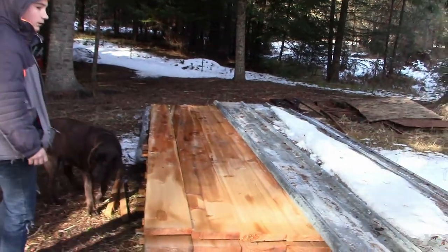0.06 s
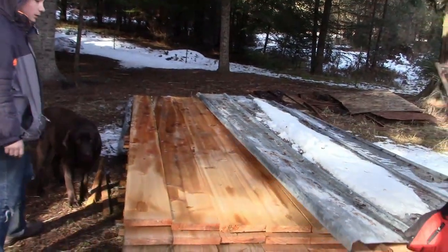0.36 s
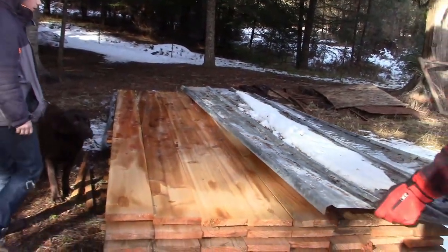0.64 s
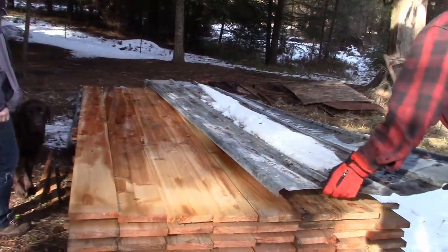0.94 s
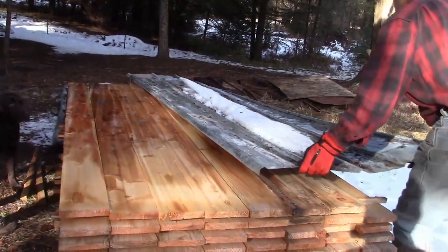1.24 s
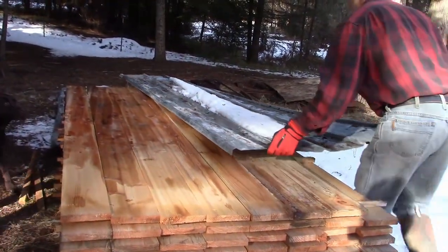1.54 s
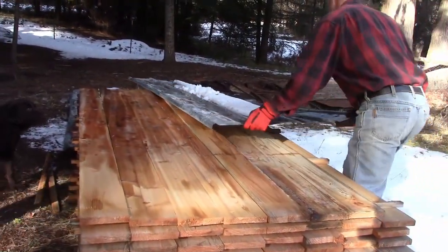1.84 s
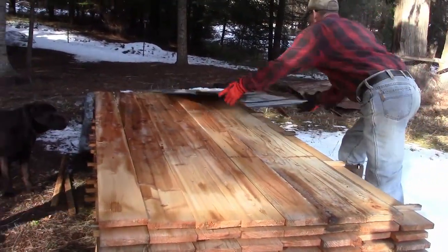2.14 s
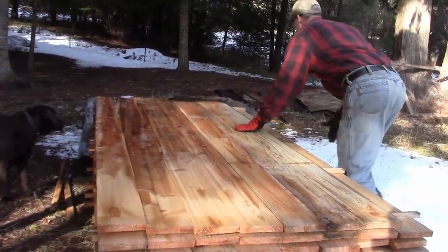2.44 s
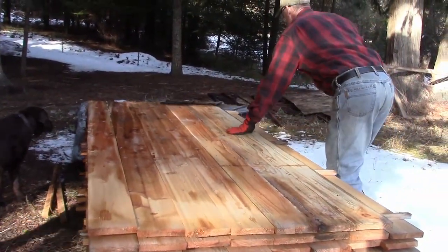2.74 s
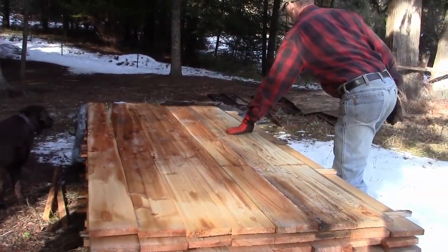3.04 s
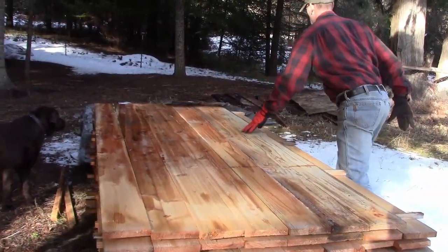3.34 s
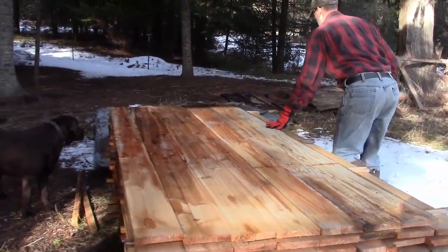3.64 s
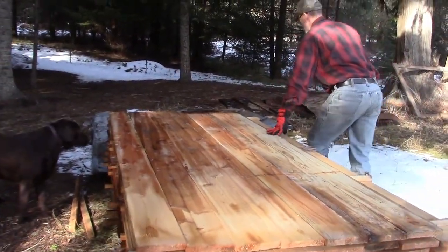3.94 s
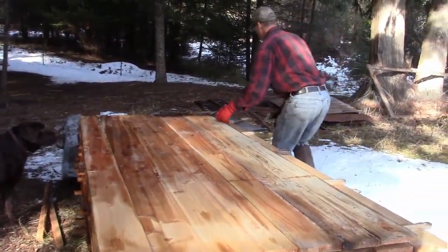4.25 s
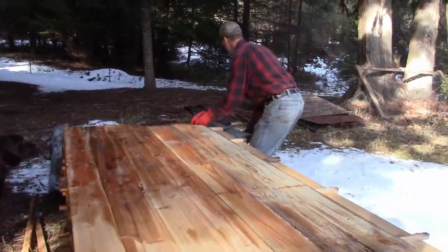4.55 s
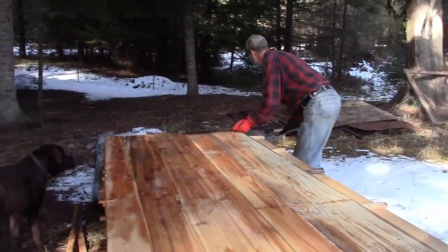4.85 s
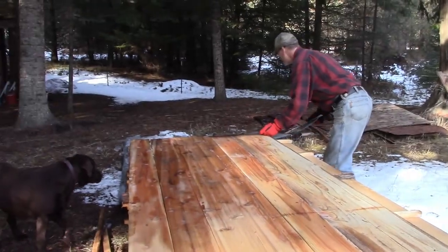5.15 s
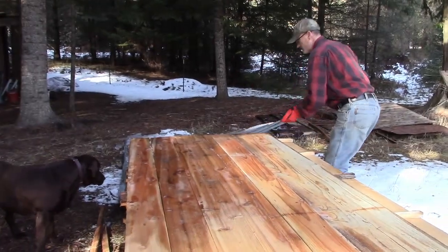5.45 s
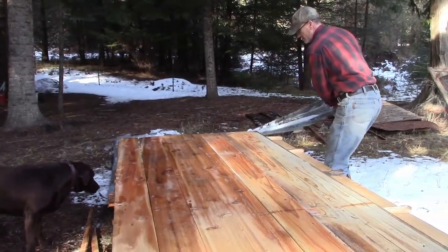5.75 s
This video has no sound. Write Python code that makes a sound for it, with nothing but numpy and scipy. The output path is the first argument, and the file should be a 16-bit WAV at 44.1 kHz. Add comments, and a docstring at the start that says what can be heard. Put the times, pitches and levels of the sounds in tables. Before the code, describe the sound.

In a hushed outdoor yard, a metal roofing panel sticks and slips across stacked lumber, heard from close by. Gritty, droning scrapes grow louder, dotted with sharp snaps, knocks and hollow thumps as the panel flexes. Weaker scrapes follow, with two brief squeaks, a soft swish and scattered bumps. A last strong shove brings a sinking metallic groan and a couple of knocks, echoing faintly off the trees.

```python
"""A snowy yard: a corrugated steel roofing sheet is dragged off a stack of boards, then shoved alongside.
Its edge sticks and slips on the wood: the panel rumbles, the ribs drone, the edge rasps, trapped grit hisses.
Snaps, knocks and buckling thumps punctuate the pulls, with two squeaks, a swish and a late groan.
Behind it sit a steady hush and a faint echo from the trees; a near, almost mono microphone rounds the peaks."""
import sys
import numpy as np
from scipy import signal
from scipy.fft import rfft, irfft, next_fast_len
from scipy.io import wavfile
from scipy.ndimage import uniform_filter1d, map_coordinates

SR = 44100
rng = np.random.default_rng(int(sys.argv[2]) if len(sys.argv) > 2 else 0)


def digitize_waveform(pressure):
    """Quantize a signal to 16-bit integers and store it at the path in sys.argv[1].

    Rows of a 2-D input are taken as channels; values are limited to [-1, 1].
    """
    field = np.atleast_2d(pressure).T
    bounded = np.clip(field, -1, 1)
    quanta = np.round(bounded * 32767).astype(np.int16)
    wavfile.write(sys.argv[1], SR, quanta)


N = 260190

# Table levels are relative: each layer is scaled again on its way into the mix.
# tone of the quiet yard: f/Hz, level/dB
AIR_COLOUR = [(18, -55), (30, -10), (195, -6.5), (346, -8), (597, -12.5), (928, -20), (1030, -24),
              (1650, -24), (7630, -32), (15000, -31)]
# stereo width of the hush: f/Hz, side minus mid/dB
AIR_SIDE = [(40, -7), (150, -13.5), (600, -11), (2400, -1), (8000, -3), (12000, -24)]
# decay of the echo from the trees: f/Hz, t60/s
ECHO_DECAY = [(200, 0.12), (2000, 0.34), (10000, 0.77)]
# tone of that echo: f/Hz, level/dB
ECHO_COLOUR = [(60, -21), (200, -31), (600, -30), (1200, -27.5), (2300, -17.5), (4500, -18), (8000, -27.5),
               (12000, -12)]
# mismatch of the two microphone ports: f/Hz, left minus right/dB
PORT_MISMATCH = [(100, 0.5), (1000, 0.07), (2200, 0.93), (4500, -0.5), (8000, 0.8)]
# broad tone of the sheet: f/Hz, level/dB
STEEL_COLOUR = [(21, -67), (35, -89), (81, -22), (139, -6), (198, -3), (375, -7), (640, 2), (963, -4),
                (1120, -6.5), (1640, -9), (2410, -14.5), (2810, -17), (4330, -17.5), (7790, 7),
                (15500, -52)]
# resonances on top of that tone: f/Hz, width/Hz, level/dB
STEEL_MODES = [(130, 56, -0.5), (223, 61, -2), (252, 70, 1), (567, 46, 0), (655, 70, -18), (790, 40, -28),
               (1000, 180, -1.5), (1250, 130, -4.5), (1625, 84, -4), (1710, 45, -10), (2490, 75, -8.5),
               (2660, 210, -2), (3130, 90, -19), (3370, 87, 5.5), (4950, 120, 2), (5950, 320, 15),
               (7300, 300, -1), (7950, 300, -1)]
# tone of crushed grit: f/Hz, level/dB
GRIT_COLOUR = [(1180, -30), (2000, 6), (2650, 10), (3460, -4.5), (3740, -5.5), (4320, -7.5), (5450, -10.5),
               (7610, -7.5), (11800, -28.5), (14200, -33), (15500, -37)]
# a soft swish, sinking in pitch: t/s, f/Hz, level/dB
SWISH_PATH = [(4.2, 7750, -48), (4.28, 7200, -46), (4.37, 6200, -36.5), (4.46, 5140, -44),
              (4.54, 4800, -58)]
# the bending sheet groans: t/s, f/Hz, level/dB
GROAN_PATH = [(5.36, 660, -46), (5.4, 605, -25), (5.425, 584, -18), (5.47, 504, -21.5), (5.51, 450, -18.5),
              (5.55, 460, -20), (5.6, 480, -28)]
# steel squeaks on steel: t/s, length/s, f/Hz, level/dB
STEEL_SQUEAKS = [(2.819, 0.038, 3190, -34.5), (3.219, 0.046, 1540, -25)]
# coarse grit and splinters snap under the edge: t/s, level/dB, f/Hz
GRIT_SNAPS = [(.108, -28, 2880), (.403, -5.5, 3150), (.42, -8.5, 6100), (.611, -9.5, 6900),
              (.723, -11, 7270), (0.884, -1.5, 2200), (.887, -2, 5820), (.976, -8.5, 6000),
              (1.104, -20, 7980), (1.285, -11, 6560), (1.307, -12.5, 2160), (1.752, -3.5, 1860),
              (1.783, -17, 6000), (1.82, -6.5, 7140), (1.943, -7, 7220), (1.965, -14, 6100),
              (2.002, -4, 7400), (2.022, 2.5, 7400), (2.152, -3, 7150), (2.328, -5.5, 4200),
              (2.409, -20, 3950), (2.72, -8, 1570), (3.273, -20, 4570), (3.888, -29, 6950),
              (3.96, -27.5, 6870), (4.144, -22, 2000), (4.185, -21, 1900), (4.194, -18.5, 2100)]
# the ribs knock on the boards: t/s, level/dB, f/Hz, t60/s
RIB_KNOCKS = [(.794, -9.5, 940, 0.34), (.887, -3.5, 670, 0.11), (.932, -9, 724, 0.094),
              (1.03, -13.5, 543, 0.15), (1.422, -7, 935, 0.079), (1.961, 0.5, 642, 0.13),
              (2.388, 2, 752, 0.17), (3.098, -15.5, 693, 0.11), (3.432, -18.5, 703, 0.23),
              (3.738, -30.5, 680, 0.12), (4.069, -39, 880, 0.021), (4.183, -17.5, 1175, 0.059),
              (4.796, -11, 685, 0.086), (4.949, -8.5, 670, 0.033), (5.033, -15.5, 648, .03),
              (5.319, -15, 673, 0.18), (5.341, -9, 645, 0.075), (5.6, -4.5, 782, 0.087),
              (5.62, -3, 730, 0.073)]
# the whole panel buckles or lands: t/s, level/dB, f/Hz
PANEL_THUMPS = [(0.15, -24.5, 258), (0.451, -17, 266), (1.056, -18, 226), (1.274, -14, 164),
                (1.412, -13, 293), (1.881, -5.5, 340), (1.881, -13, 124), (1.962, -6, 258),
                (2.345, -7, 238), (2.443, -5, 199), (2.468, -5.5, 150), (2.529, -6.5, 201),
                (3.356, -21, 243), (4.026, -30, 252), (4.083, -26, 310), (4.185, -13, 257),
                (4.834, -20, 220), (4.987, -15.5, 177), (5.033, -22.5, 236), (5.342, -18.5, 205)]
# one thin, dry tick: t/s, level/dB, f/Hz, t60/s
DRY_TICK = [(4.602, -11.5, 10500, 0.0019)]
# centre of the rasp, darker once the boards shade the lowered sheet: t/s, f/Hz
RASP_SHADE = [(0, 2130), (2.4, 1840), (3.4, 1690), (4.7, 1420), (5.9, 1600)]
# tugs and shoves: t/s, 20 dB rise in effort/s, build/s, 20 dB fall in effort/s, drone crest level/dB,
# build-up/dB, rumble over drone/dB, rasp over drone/dB, grit over drone/dB, drone crest f/Hz
TUGS = [(0, .02, 0.0073, 0.27, -39.5, 3.5, -2.5, -1.5, -1, 560),
        (0.111, 0.013, 0.025, 0.16, -43, -7, -19, 0, 1.5, 800),
        (.28, 0.26, .15, 0.036, -37, 4, -19, -1, 0, 716),
        (0.472, 0.082, 0.32, 0.56, -23.5, 5, -8.5, 0, -3.5, 840),
        (1.159, 0.13, 0.12, 0.44, -20.5, 6, -16, -9, -14.5, 760),
        (1.389, 0.12, .12, 0.51, -21.5, 3, -11, -2, -6.5, 905),
        (1.719, 0.091, 0.34, 0.42, -19, 6.5, -12.5, -4, -5.5, 882),
        (2.099, .05, .2, 0.066, -12, 2.5, -17.5, -5.5, -23, 930),
        (2.33, 0.013, 0.079, 0.035, -16, -1, -5.5, 1.5, -7, 770),
        (2.445, 0.045, 0.073, 0.29, -16.5, 1, -6, -5, -11, 770),
        (2.62, 0.11, 0.11, 0.28, -29, 0.5, -1, -3, -7, 670),
        (2.848, 0.31, 0.14, 0.35, -25.5, 4, -1.5, -2.5, -6, 740),
        (3.279, 0.22, 0.047, 0.34, -32, 3.5, -0.5, -0.5, -7, 656),
        (4.04, 0.059, 0.096, 0.18, -38, 11, 0, 0, -8.5, 720),
        (4.26, 0.11, 0.21, 0.57, -52.5, -1, -12, 1, 8.5, 770),
        (4.56, 0.22, 0.1, 0.17, -45.5, -1.5, 1, -4, -3, 650),
        (4.798, 0.097, 0.2, .13, -29, -3.5, -2.5, -6, -17.5, 752),
        (5.11, .04, 0.017, 0.72, -51.5, -1, 0, -6, 2.5, 650),
        (5.252, 0.059, 0.032, 0.11, -37, -1.5, -5.5, -4.5, -6, 646),
        (5.35, .04, 0.26, 0.24, -15, 15.5, -11, -6, -15.5, 750),
        (5.73, .06, 0.072, 0.17, -32, 8, -4.5, -8, -9, 646)]
# growth with effort, in dB per dB: rumble, drone, rasp, grit
EFFORT_SLOPES = [0.89, 1.254, 1.084, 1.32]
# floor while the held sheet only creeps: rumble/dB, drone/dB, rasp/dB, grit/dB
CREEP_LEVELS = [-52, -54, -54, -57.5]
# brightness of the snaps: f/Hz, level/dB
SNAP_COLOUR = [(1000, -6.5), (8000, 8.0), (11000, -3.5), (15500, -13)]


def amp(db):
    """Decibels to gain."""
    return 10 ** (np.asarray(db) / 20)


def unit(x):
    """Scale to rms 1."""
    return x / np.sqrt(np.mean(x ** 2) + 1e-20)


def along(points, hz):
    """Read (Hz, value) points on a log axis."""
    f, v = np.transpose(points)
    return np.interp(np.log(hz + 1), np.log(f + 1), v)


def curves(rows):
    """An automation curve for each column after the time."""
    s, *cols = np.transpose(rows)
    return [np.interp(np.arange(N) / SR, s, c) for c in cols]


def wobble(rate):
    """A smooth random curve, rate knots a second."""
    knots = rng.standard_normal(int(N * rate / SR) + 4)
    return map_coordinates(knots, [np.arange(N) * rate / SR])


def filtered(x, response):
    """EQ x with a gain curve over frequency."""
    n = x.shape[-1]
    m = next_fast_len(n + SR // 4)
    return irfft(rfft(x, m) * response(np.fft.rfftfreq(m, 1 / SR)), m)[..., :n]


def band(hz, low_hz, high_hz, order=10):
    """Gain of a band with steep, smooth edges."""
    return ((1 + (low_hz / (hz + 1)) ** order) * (1 + (hz / high_hz) ** order)) ** -.5


def hump(hz, centre_hz, octaves):
    """Gain of a round-topped resonance."""
    return 1 / np.sqrt(1 + (np.log2((hz + 1) / centre_hz) / octaves) ** 4)


def swept(x, centre_hz, octaves):
    """x through a resonance whose centre moves."""
    hz, t, z = signal.stft(x, SR, nperseg=1024)
    centre = np.interp(t, np.arange(N) / SR, centre_hz)
    return signal.istft(z * hump(hz[:, None], centre, octaves), SR, nperseg=1024)[1][:N]


def sustained(x, size=1200):
    """Hold a vibration at rms 1, as a steady pull does."""
    power = uniform_filter1d(uniform_filter1d(x * x, size), size)
    return x / np.sqrt(abs(power) + 1e-20)


def air():
    """The bed: the steady hush of the yard."""
    noise = rng.standard_normal((2, N))
    mid, side = filtered(noise, lambda hz: amp(along(AIR_COLOUR, hz)) * band(hz, 68, 14500, order=6))
    side = filtered(side, lambda hz: amp(along(AIR_SIDE, hz)))
    return amp(-52.0) * unit(np.array([mid + side, mid - side]))


def tree_echo(x):
    """Trunks scatter a faint echo, different on each side."""
    hz, t, z = signal.stft(rng.standard_normal((2, SR // 2)), SR, nperseg=256)
    decay = amp(-60 * t / along(ECHO_DECAY, hz)[:, None])
    tail = signal.istft(z * decay, SR, nperseg=256)[1]
    echo = signal.fftconvolve(x[None], tail / np.linalg.norm(tail[0]), axes=1)[:, :N]
    return filtered(echo, lambda hz: amp(along(ECHO_COLOUR, hz)))


def slips(rate, spread_db, smooth):
    """Friction: random micro-slips of uneven size over a smooth rub."""
    chance, size, rub = rng.random(N), rng.standard_normal(N), rng.standard_normal(N)
    kicks = (chance < rate / SR) * np.sign(rub) * amp(spread_db * np.clip(size, -2, 2))
    return unit(kicks) + smooth * rng.standard_normal(N)


def glide(path, octaves, rate):
    """A rub through one gliding resonance, silent outside its path."""
    centre_hz, db = curves(path)
    gate = np.interp(np.arange(N) / SR, [path[0][0], path[-1][0]], [1, 1], 0, 0)
    rub = slips(rate, spread_db=5.0, smooth=0.96)
    return gate * amp(db) * sustained(swept(rub, centre_hz, octaves))


def swish():
    """A soft, hissing rub with neither body nor much top."""
    return filtered(glide(SWISH_PATH, octaves=0.54, rate=2500), lambda hz: band(hz, 1500, 10700, order=8))


def groan():
    """The bending sheet groans: friction through a narrow, sagging resonance."""
    return glide(GROAN_PATH, octaves=0.11, rate=820)


def squeaks(scoop=0.1, scoop_s=0.0065):
    """For a moment the slips lock into a wavering tone that scoops up to pitch."""
    out = np.zeros(N)
    for s, length, pitch_hz, db in STEEL_SQUEAKS:
        age = np.clip(np.arange(N) / SR - s, 0, length)
        hz = pitch_hz * (1 - scoop * np.exp(-age / scoop_s) + 0.0147 * wobble(230))
        envelope = np.sin(np.pi * age / length) * amp(db + 1.2 * wobble(200))
        out += envelope * unit(np.sin(2 * np.pi * np.cumsum(hz) / SR))
    return out


def steel(hz):
    """Gain of the sheet: resonances standing on its broad colour."""
    peaks = sum(amp(db) ** 2 / (1 + (2 * (hz - centre) / width) ** 2) for centre, width, db in STEEL_MODES)
    return amp(along(STEEL_COLOUR, hz)) * np.sqrt(1 + peaks)


def blows(rows, colour, octaves, attack_s, tone):
    """Each hit wakes the part of a colour near its own pitch; tone weights the leading mode."""
    out, t = np.zeros(N + SR), np.arange(SR // 4) / SR
    for s, db, centre_hz, t60 in rows:
        noise = rng.standard_normal(len(t))
        body = unit(filtered(noise, lambda hz: colour(hz) * hump(hz, centre_hz, octaves)))
        envelope = (1 - np.exp(-t / attack_s)) * amp(-60 * t / t60)
        ring = (body + tone * np.sin(2 * np.pi * centre_hz * t)) * envelope
        out[round(s * SR):][:len(t)] += amp(db) * ring / abs(ring).max()
    return out[:N]


def impacts(snap_t60=0.039, thump_t60=0.13):
    """The accents: sharp snaps of grit, knocks of the ribs, thumps of the panel and a lone tick."""
    snaps = blows([(*row, snap_t60) for row in GRIT_SNAPS], lambda hz: amp(along(SNAP_COLOUR, hz)),
                  octaves=0.53, attack_s=0.00023, tone=0.45)
    knocks = blows(RIB_KNOCKS, steel, octaves=0.47, attack_s=0.0012, tone=1.7)
    thumps = blows([(*row, thump_t60) for row in PANEL_THUMPS], steel,
                   octaves=0.63, attack_s=0.0031, tone=0.6)
    tick = blows(DRY_TICK, lambda hz: band(hz, 7900, 8400), octaves=0.25, attack_s=0.00019, tone=.3)
    return amp(-5.5) * snaps + amp(-2.5) * knocks + amp(-1.0) * thumps + tick


def catches(rate, spread_db, t60):
    """Brief noise bursts where the edge snags a splinter."""
    t = np.arange(SR // 20) / SR
    chance, size, noise = rng.random(N), rng.standard_normal(N), rng.standard_normal(N)
    snags = (chance < rate / SR) * amp(spread_db * np.clip(size, -2, 1.5))
    return unit(noise * signal.fftconvolve(snags, amp(-60 * t / t60))[:N])


def crackle(grit_db, under_db=16.5, off_stack_s=2.2):
    """While the sheet's weight is on the boards, single grains crack beneath the hiss."""
    grains = catches(rate=40, spread_db=7, t60=0.0074)
    cracks = unit(filtered(grains, lambda hz: band(hz, 3500, 10000, order=5)))
    return cracks * amp(grit_db - under_db) * (np.arange(N) / SR < off_stack_s)


def ringing(x, t60, ring_db, count=24):
    """Slips echo within the sheet; its dense ring changes as the contact travels."""
    t = np.arange(SR // 4) / SR
    tails = rng.standard_normal((count, len(t))) * amp(-60 * t / t60)
    out = np.zeros(N + len(t))
    for stretch, tail in zip(np.array_split(np.arange(N), count), tails):
        ring = signal.fftconvolve(x[stretch], tail / np.linalg.norm(tail))
        out[stretch[0]:][:len(ring)] += ring
    return x + amp(ring_db) * out[:N]


def shifting(x, depth_db):
    """The colour drifts in patches as new parts of the edge touch."""
    z = signal.stft(x, nperseg=512)[2]
    patches = uniform_filter1d(rng.standard_normal(z.shape), size=7, axis=0)
    patches = uniform_filter1d(patches, size=22, axis=1)
    return signal.istft(z * amp(depth_db * unit(patches)), nperseg=512)[1][:N]


def pulls(slack_hz=616):
    """Each pull grips, builds and lets go; effort rides four faders (dB) and tightens the drone (Hz)."""
    t = np.arange(N) / SR
    power, bend_hz = amp(CREEP_LEVELS)[:, None] ** 2, slack_hz
    for start, grip_s, build_s, fade_s, db, build_db, rumble_db, rasp_db, grit_db, crest_hz in TUGS:
        age = t - start
        grip_db = 20 * np.minimum(age, 0) / grip_s
        fade_db = -20 * np.maximum(age - build_s, 0) / fade_s
        effort_db = grip_db - build_db * np.clip(1 - age / build_s, 0, 1) + fade_db
        crest_db = db + np.array([[rumble_db], [0], [rasp_db], [grit_db]])
        power = power + amp(crest_db + np.outer(EFFORT_SLOPES, effort_db)) ** 2
        bend_hz = bend_hz + (crest_hz - slack_hz) * amp(effort_db)
    judder_db = 0.22 * wobble(rate=24)  # the sheet slides unevenly
    return 10 * np.log10(power) + judder_db, bend_hz


def scrape():
    """The lead: one stick-slip contact drives panel, ribs and edge; grit is crushed beneath."""
    (rumble_db, drone_db, rasp_db, grit_db), bend_hz = pulls()
    shade_hz, = curves(RASP_SHADE)
    contact = ringing(slips(rate=1600, spread_db=3.0, smooth=0.68), t60=0.14, ring_db=-7.5)
    crush = ringing(slips(rate=2200, spread_db=2, smooth=0.8), t60=0.08, ring_db=-8)
    snags = catches(rate=120, spread_db=-1.0, t60=0.022)
    chatter = wobble(rate=95)  # the edge catches and lets go
    rasp_colour = lambda hz: steel(hz) * band(hz, 1250, 3260)
    grit_colour = lambda hz: amp(along(GRIT_COLOUR, hz)) * band(hz, 3940, 13500)
    panel = sustained(filtered(contact, lambda hz: steel(hz) * band(hz, 62, 370)))
    ribs = filtered(contact, lambda hz: steel(hz) * band(hz, 286, 1250))
    ribs = sustained(swept(shifting(ribs, depth_db=2.5), bend_hz, octaves=0.71))
    edge = shifting(filtered(contact, rasp_colour), depth_db=1.47)
    edge = sustained(swept(edge, shade_hz, octaves=1.0))
    edge += amp(-8.0) * unit(filtered(snags, rasp_colour))
    grit = sustained(shifting(filtered(crush, grit_colour), depth_db=2.5))
    grit += amp(-6.5) * unit(filtered(snags, grit_colour))
    return (panel * amp(rumble_db + 0.88 * chatter)
            + ribs * amp(drone_db + chatter)
            + edge * amp(rasp_db + 1.7 * chatter)
            + grit * amp(grit_db + 1.04 * chatter)
            + crackle(grit_db))


def scene():
    """The mix: the sheet almost dead centre, its echo and the still air."""
    sheet = scrape() + impacts() + squeaks() + groan() + swish()
    half_each = np.array([[.5], [-.5]])  # left and right share the port mismatch
    direct = filtered(sheet, lambda hz: amp(half_each * along(PORT_MISMATCH, hz)))
    return direct + tree_echo(sheet) + air()


def record(dry, lopsided=0.013, knee=6, top_hz=15800):
    """The microphone soft-clips the loudest peaks, a little unevenly, and cuts the extreme top."""
    bent = dry + lopsided * dry ** 2
    rounded = bent / (1 + abs(bent) ** knee) ** (1 / knee)
    return filtered(rounded, lambda hz: hz < top_hz)


dry = scene()
out = record(dry)
digitize_waveform(out)
```